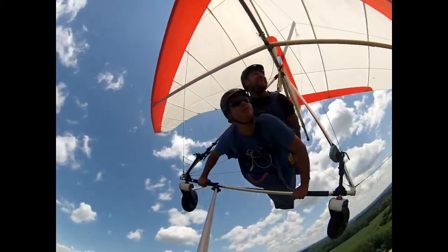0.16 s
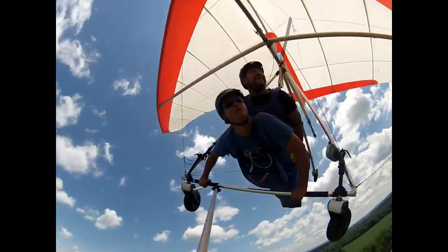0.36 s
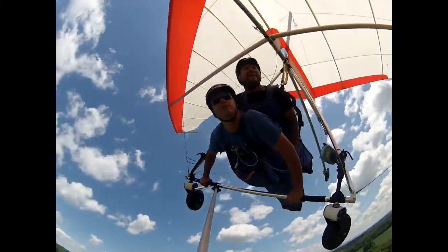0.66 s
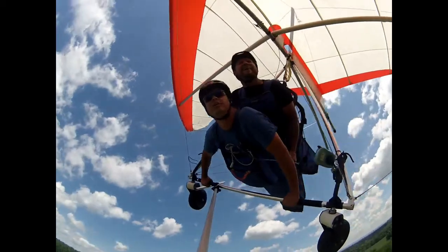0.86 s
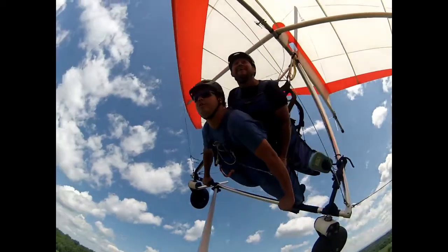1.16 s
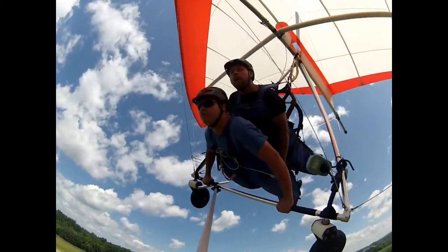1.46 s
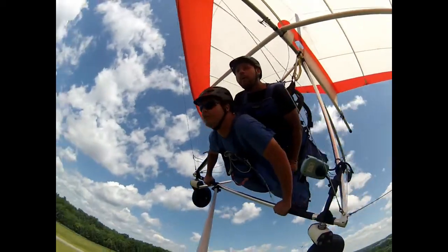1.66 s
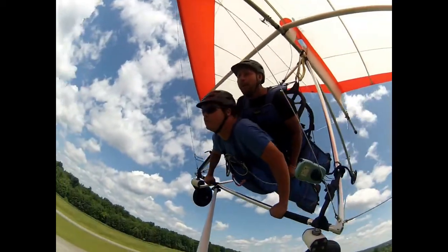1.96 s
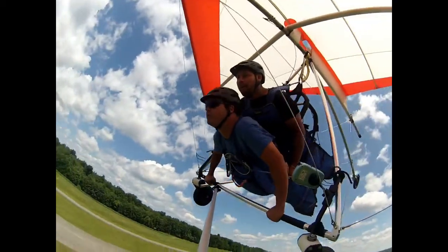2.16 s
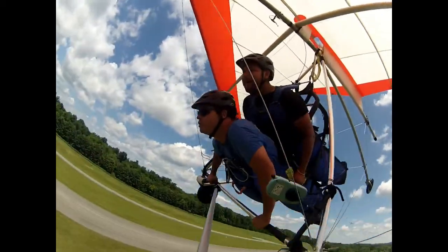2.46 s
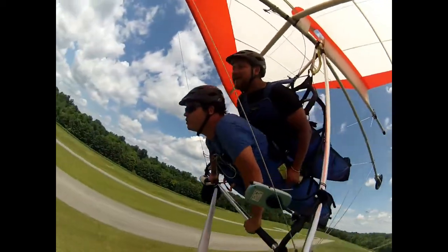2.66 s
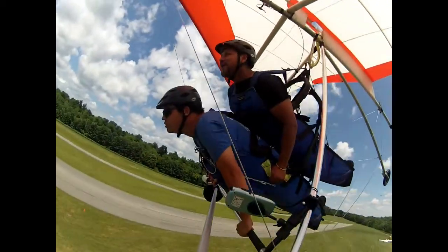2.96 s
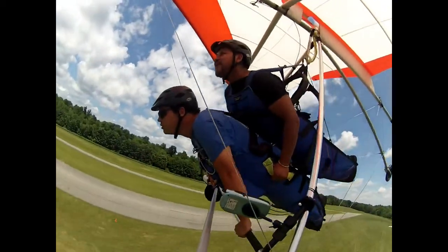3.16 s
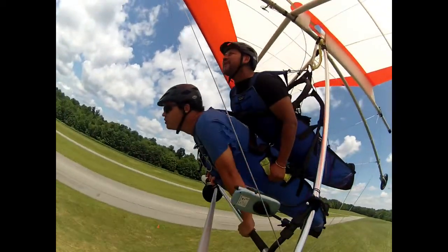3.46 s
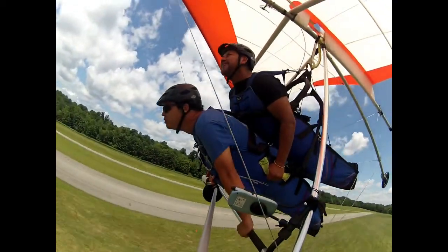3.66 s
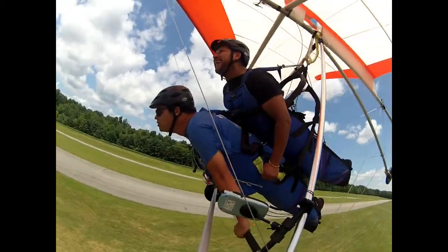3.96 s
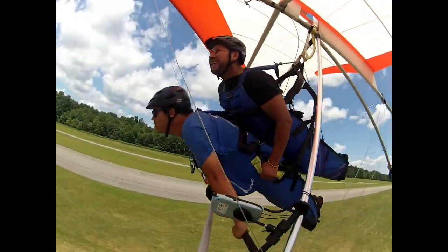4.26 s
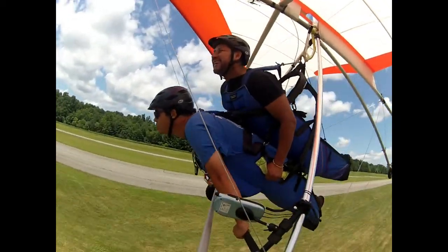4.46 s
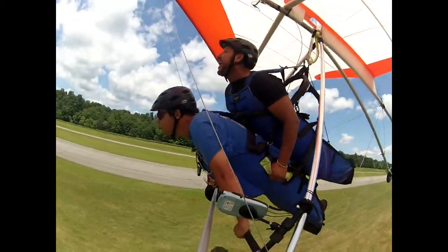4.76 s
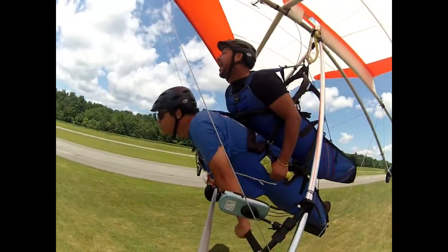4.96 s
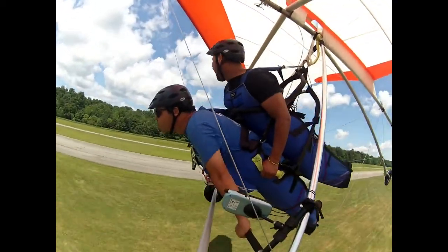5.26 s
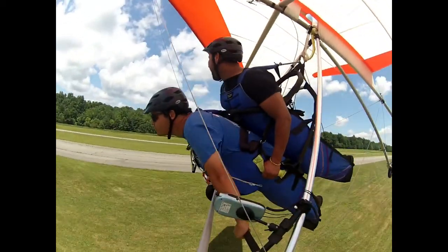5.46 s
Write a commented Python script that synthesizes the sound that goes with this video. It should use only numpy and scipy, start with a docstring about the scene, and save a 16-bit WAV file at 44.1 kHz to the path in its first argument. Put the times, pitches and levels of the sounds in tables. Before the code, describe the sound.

Air rushes over a small housed microphone in flight, deep and fluttering, building over several seconds to a strong gusty roar.

```python
"""Wind noise: air rushes over a small camera in a hard housing on a gliding wing.
Every size of eddy is noise, coloured by its own spectrum, with a level that varies in time:
large ones sway and buffet, middle ones rumble, growl and roar,
small ones rush and whoosh in ragged bursts, the smallest fizz and crackle at the port.
Beneath lie a faint electronic whine and hiss; the treble is dulled above 10.5 kHz and ends near 15.7 kHz."""
import sys
import numpy as np
from scipy import signal
from scipy.fft import rfft, irfft, next_fast_len
from scipy.io import wavfile
from scipy.ndimage import uniform_filter1d

SR = 44100
rng = np.random.default_rng(int(sys.argv[2]) if len(sys.argv) > 2 else 0)


def transcribe(signal):
    """Save signal, clipped to [-1, 1], as a 16-bit WAV file at the path in sys.argv[1]."""
    frames = np.atleast_2d(signal).T
    limited = np.clip(frames, -1, 1)
    pcm = np.round(limited * 32767).astype(np.int16)
    wavfile.write(sys.argv[1], SR, pcm)


N = 246959

# Spectral density of the smallest eddies, at the port, before scaling to rms 1: frequency_hz, density_db
FIZZ_SPECTRUM = [(1300, -19), (2600, 6.5), (3400, 4.5), (4100, 2.5), (5500, 2), (7100, -4.5), (8600, -10),
                 (10400, -13.5), (15000, -13.5)]


def gain_of(db):
    """Level: decibels express an amplitude ratio as 20 times its logarithm."""
    return 10 ** (np.asarray(db) / 20)


def evened(x):
    """Normalisation: division by the root mean square gives rms 1."""
    return x / np.sqrt(np.mean(x ** 2) + 1e-20)


def colour(x, points):
    """Linear filtering: a spectrum drawn on a log-frequency axis weights the signal, then rms is 1."""
    point_hz, point_db = np.transpose(points)
    size = next_fast_len(N)
    hz = np.fft.rfftfreq(size, 1 / SR)
    response_db = np.interp(np.log(hz + 1), np.log(point_hz + 1), point_db)
    filtered = irfft(rfft(x, size) * gain_of(response_db), size)
    return evened(filtered[:N])


def curve(points):
    """Slow variation: each column of a table becomes straight lines in time."""
    s, *columns = np.transpose(points)
    return [np.interp(np.arange(N) / SR, s, c) for c in columns]


def bells(table, half_s):
    """Transient envelope: Gaussian swells in dB, 1/e at half_s, added up for each column."""
    s, *columns_db = np.transpose(table)
    shapes = np.exp(-((np.arange(N) / SR - s[:, None]) / half_s) ** 2)
    return np.array(columns_db) @ shapes


def flutter(lo_hz, hi_hz):
    """Random modulation: band-limited 1/f noise of rms 1, whose slower swings are larger."""
    fall_db = -10 * np.log10(hi_hz / lo_hz)
    points = [(lo_hz / 2, -40), (lo_hz, 0), (hi_hz, fall_db), (hi_hz * 2, -60)]
    return colour(rng.standard_normal(N), points)


def steadied(x, span_s, share):
    """Envelope compression: a share of the slow lumps is divided out, so the level tables set most of them."""
    size = round(span_s * SR)
    power = uniform_filter1d(uniform_filter1d(x ** 2, size), size)
    return evened(x / (abs(power) + 1e-9) ** (np.clip(share, 0, 1) / 2))


def eddies(points, level_db, ragged_db, steady):
    """Turbulence: white noise flutters as eddies pass, then takes their spectrum and level."""
    lump_s = .06  # averaging span for the lumps in the noise
    fluttering = rng.standard_normal(N) * gain_of(ragged_db)
    noise = colour(fluttering, points)
    return gain_of(level_db) * steadied(noise, lump_s, steady)


def large_eddies(swell_db):
    """Low-frequency turbulence: the largest eddies sway and buffet the housing."""
    # Base levels, before the swells: start_s, sway_db, buffet_db
    buffet_level = [(0.0, -44, -41.5), (.35, -40.5, -42), (.55, -41.5, -40), (.75, -37.5, -40),
                    (.95, -52, -37.5), (1.1, -45, -39), (1.4, -43.5, -35), (1.65, -52, -42),
                    (1.83, -52, -32.5), (2.0, -43.5, -47.5), (2.15, -53.5, -37), (2.5, -46.5, -42.5),
                    (2.78, -37, -40.5), (2.95, -54, -36.5), (3.15, -41, -34), (3.35, -41, -42.5),
                    (3.6, -42, -36.5), (4.0, -44, -37), (4.2, -50, -34), (4.38, -37.5, -38.5),
                    (4.55, -51, -37.5), (4.8, -35, -44.5), (4.93, -46, -37.5), (5.05, -43, -36),
                    (5.38, -43, -43), (5.55, -46, -40), (5.6, -47, -26)]
    # Spectral density before scaling to rms 1: frequency_hz, density_db
    buffet_spectrum = [(25, -42), (50, -11), (70, -3), (95, 0.5), (120, -7.5), (250, -39.5), (500, -84.5)]
    sway_spectrum = [(8, -42.5), (20, -9), (35, -1), (50, 0), (65, -8), (120, -40.5), (300, -83)]
    sway_db, buffet_db = curve(buffet_level)
    buffet = eddies(buffet_spectrum, buffet_db + swell_db, 0, 0.6)
    sway = eddies(sway_spectrum, sway_db + swell_db, 0, 0.22)
    return buffet + sway


def middle_eddies(rumble_db, growl_db, swell_db, knocks, flicker):
    """Shared modulation: the same knocks shake rumble and growl, so both swell together."""
    # Spectral density before scaling to rms 1: frequency_hz, density_db
    rumble_spectrum = [(40, -30), (85, -9.5), (120, 1.5), (165, 3), (210, -2.5), (300, -31), (600, -81)]
    growl_spectrum = [(90, -35.5), (170, -6), (220, -0.5), (290, -1), (350, -7), (500, -33), (1000, -78)]
    rumble = eddies(rumble_spectrum, rumble_db + swell_db + 0.52 * knocks, 0.21 * flicker, 0.62)
    growl = eddies(growl_spectrum, growl_db + swell_db + 0.53 * knocks, 0.81 * flicker, .55)
    return rumble + growl


def roaring_eddies(roar_db, rush_db, swell_db, lumps, flurries, flicker):
    """Equal-power crossfade: a dull roar in slack air gives way to a brighter one as the rush grows."""
    # Spectral density before scaling to rms 1, in brisk and in slack air: frequency_hz, density_db
    brisk_spectrum = [(150, -39), (280, -8.5), (370, -1), (520, -4.5), (800, -12), (1100, -27.5),
                      (2200, -74.5)]
    slack_spectrum = [(150, -37), (280, -7), (350, -2), (450, -5), (650, -15), (1100, -36.5), (2200, -75.5)]
    slack_db, brisk_db = -60.5, -45.  # base rush levels between which the roar brightens
    brisk = np.clip((rush_db - slack_db) / (brisk_db - slack_db), 0, 1)
    level_db = roar_db + swell_db + 0.3 * lumps
    ragged_db = 0.25 * flurries + 1.2 * flicker
    bright = eddies(brisk_spectrum, level_db, ragged_db, 0.66)
    dull = eddies(slack_spectrum, level_db, ragged_db, 0.65)
    return np.sqrt(brisk) * bright + np.sqrt(1 - brisk) * dull


def small_eddies(rush_db, whoosh_db, swell_db, lumps, flurries, flicker):
    """Amplitude modulation: fast flicker makes rush and whoosh ragged, slow lumps make them surge."""
    # Spectral density before scaling to rms 1: frequency_hz, density_db
    rush_spectrum = [(300, -31.5), (700, -1), (950, -1), (1400, -7.5), (1900, -16), (2600, -35.5),
                     (4000, -68.5)]
    whoosh_spectrum = [(700, -36.5), (1400, -3.5), (1800, -1.5), (2400, -4.5), (2750, -11), (3200, -19),
                       (4000, -31.5), (6000, -62.5)]
    rush_level_db = rush_db + swell_db + 0.57 * lumps
    whoosh_level_db = whoosh_db + 0.66 * swell_db + 0.55 * lumps
    rush = eddies(rush_spectrum, rush_level_db, 0.22 * flurries + 1.2 * flicker, 0.44)
    whoosh = eddies(whoosh_spectrum, whoosh_level_db, 0.36 * flurries + 1.5 * flicker, 0.38)
    return rush + whoosh


def crackle(per_s, spread_db):
    """Impulse noise: sparse random pulses of uneven size and either sign take the fizz spectrum."""
    excess = np.minimum(rng.exponential(1, N), 4)
    size = gain_of(spread_db * excess) * rng.choice([-1., 1.], N)
    struck = rng.random(N) < per_s / SR
    return colour(size * struck, FIZZ_SPECTRUM)


def smallest_eddies(fizz_db, lull_db, lumps, flurries, flicker):
    """High-frequency turbulence: continuous fizz at the port, with a fainter crackle at 150 pulses/s."""
    level_db = fizz_db + 0.34 * lumps - lull_db
    ragged_db = 0.25 * flurries + 0.37 * flicker + 0.27 * flutter(6.2, 30.)
    fizz = eddies(FIZZ_SPECTRUM, level_db, ragged_db, .3)
    return fizz + gain_of(level_db - 6.5) * crackle(150., 2.5)


def wind():
    """Superposition: all sizes of eddy add up, tied together by shared swells, lulls and flutter."""
    # Base levels over time, rising overall with airspeed, with random lumps of turbulence included:
    # start_s, rumble_db, growl_db, roar_db, rush_db
    airflow = [(0.0, -40, -38.5, -48, -59), (.19, -39.5, -41, -45.5, -59.5),
               (.4, -39.5, -39.5, -48.5, -58.5), (.65, -38.5, -43, -49, -60.5),
               (.74, -41, -39.5, -43.5, -57.5), (.85, -44.5, -35, -40, -54),
               (1.0, -34.5, -41, -41.5, -52.5), (1.1, -39, -36.5, -37, -50.5),
               (1.25, -42.5, -36, -41, -50.5), (1.6, -34.5, -38.5, -35, -49), (1.8, -40, -36, -36, -48),
               (2.05, -40.5, -36.5, -36.5, -48), (2.17, -40, -36.5, -40.5, -48),
               (2.4, -35.5, -40, -42, -46.5), (2.6, -34.5, -38, -41, -48), (2.8, -36.5, -36, -41.5, -48.5),
               (3.05, -35.5, -38, -36, -44.5), (3.35, -33, -33, -33.5, -43.5),
               (3.6, -37.5, -33, -38.5, -44.5), (3.9, -35, -38, -38.5, -47), (4.1, -33.5, -35.5, -39, -46),
               (4.2, -38, -34.5, -34, -42.5), (4.45, -31.5, -34.5, -36, -46.5), (4.6, -40, -35, -37.5, -44),
               (4.7, -31.5, -35.5, -37, -44), (4.82, -37, -31, -36.5, -44.5), (4.9, -36, -35.5, -37.5, -45),
               (4.97, -42, -40, -35, -43.5), (5.07, -33, -35.5, -37, -44.5), (5.28, -38, -34.5, -37, -45.5),
               (5.38, -38, -40, -39, -45), (5.47, -35, -37, -36.5, -46.5), (5.6, -36, -36.5, -39.5, -46)]
    # Base levels of the smaller eddies: start_s, whoosh_db, fizz_db
    fizz_level = [(0.0, -68.5, -80), (.6, -71.5, -83), (.72, -69.5, -81.5), (.85, -65, -79.5),
                  (1.1, -62, -78.5), (1.54, -59.5, -77.5), (2.13, -60.5, -78), (2.75, -58, -74),
                  (2.95, -57, -72.5), (3.17, -56.5, -72.5), (4.0, -56.5, -72), (4.7, -56.5, -71),
                  (5.3, -57, -72.5), (5.6, -59.5, -75)]
    # Single eddies that strike the housing, or briefly leave it, as level changes:
    # centre_s, sway_and_buffet_db, rumble_and_growl_db, roar_and_rush_db (whoosh takes 0.66 of the last)
    thumps = [(.06, 9, 2, 1), (.125, -3, 6.5, 2.5), (.535, 3, 1.5, 7), (.6, -9, -7, 0.5), (.7, 9, 1, 4),
              (.86, 6, -8, 3.5), (1.889, -5, 5.5, 0.5), (2.0, 1, -1, -4), (2.62, 8.5, -1, -1),
              (2.72, 7, -2, 0), (2.97, 8, 3.5, 0), (3.13, 5, -3, 1.5), (3.57, -7, -12, -0.5),
              (3.8, 5, 7, 4), (3.93, 2, -5, 1.5), (4.23, 6, 5, -1.5), (4.295, 1, 5, 3.5), (4.4, 1, 4, 2),
              (4.445, 3, 0, 0), (4.665, 2, 3.5, 1.5), (4.78, 1, 6, 2), (4.833, -3, 6, 2.5),
              (5.04, 7, 4, -1), (5.085, -10, 6, 1.5), (5.18, 0, 1.5, 0)]
    # Brief thinning of the small eddies, a negative depth being a swell:
    # centre_s, roar_and_rush_depth_db (whoosh takes 0.66 of it), fizz_depth_db
    lulls = [(.23, 6, 1), (.63, 2, 0), (1.25, 2.5, 0), (2.14, -1, 1), (2.58, 0.5, 4), (2.7, 2.5, 4),
             (3.58, 1.5, 3), (4.07, 4, 3), (4.3, 4, 4), (5.0, 2.5, 2), (5.12, 1.5, 4), (5.38, 3.5, 0)]
    # Brief sharp changes of the small eddies: centre_s, roar_db, rush_db (whoosh takes 0.66 of it)
    bursts = [(.283, -1, 7), (.875, 1, 2), (1.06, 4, 3), (1.169, -1, 3), (1.468, 6.5, 0), (1.546, 5.5, -2),
              (1.656, 1, 6), (1.684, 3.5, 5.5), (1.98, 3, 5), (2.028, -2, 2), (2.21, 4, 6), (3.07, -4, 4.5),
              (3.236, 2, 5), (3.352, -1, -2.5), (3.445, -4, 4.5), (4.277, -5, 2), (4.514, 1, 8),
              (4.6, 8.5, 4), (4.685, 2, 6), (4.939, 4, 7), (5.321, 3, 4), (5.489, 1, 3)]
    thump_s, lull_s, burst_s = 0.0084, 0.016, 0.0037  # half-lengths

    rumble_db, growl_db, roar_db, rush_db = curve(airflow)
    whoosh_db, fizz_db = curve(fizz_level)
    buffet_swell_db, rumble_swell_db, thump_db = bells(thumps, thump_s)
    rush_lull_db, fizz_lull_db = bells(lulls, lull_s)
    roar_burst_db, rush_burst_db = bells(bursts, burst_s)
    swell_db = thump_db - rush_lull_db

    lumps, knocks = flutter(3.8, 13.0), flutter(10.0, 49.0)
    flurries, flicker = flutter(13.0, 60.0), flutter(26.0, 250.0)
    large = large_eddies(buffet_swell_db)
    middle = middle_eddies(rumble_db, growl_db, rumble_swell_db, knocks, flicker)
    roar = roaring_eddies(roar_db, rush_db, swell_db + roar_burst_db, lumps, flurries, flicker)
    small = small_eddies(rush_db, whoosh_db, swell_db + rush_burst_db, lumps, flurries, flicker)
    smallest = smallest_eddies(fizz_db, fizz_lull_db, lumps, flurries, flicker)
    return large + middle + roar + small + smallest


def whine():
    """Amplitude modulation: a thin high sine tone wavers randomly in level."""
    # Electronic tone, rms level before wavering: pitch_hz, level_db
    tones = [(10519, -99)]
    t = np.arange(N) / SR
    total = np.zeros(N)
    for pitch_hz, level_db in tones:
        waver_db = 1.5 * flutter(3., 30.)
        sine = np.sqrt(2) * np.sin(2 * np.pi * pitch_hz * t)  # rms 1
        total = total + gain_of(level_db + waver_db) * sine
    return total


def hiss():
    """Stationary random noise: the preamplifier hisses steadily."""
    # Spectral density before scaling to rms 1: frequency_hz, density_db
    hiss_spectrum = [(2100, 0), (8000, -4.5), (15500, -1)]
    return gain_of(-95) * colour(rng.standard_normal(N), hiss_spectrum)


def scene():
    """Superposition: wind at the one microphone port adds to the electronic whine and hiss."""
    return (wind() + whine() + hiss())[None]


def record(dry):
    """Band limitation: after a soft start and stop, two linear-phase filters dull and cut the treble."""
    # Treble roll-off of the whole sound: frequency_hz, gain_db
    treble_rolloff = [(0, 0), (10500, 0), (11800, -5), (12700, -6), (12800, -17), (22050, -17)]
    fade_s, edge_hz = .006, 15700
    hz, db = np.transpose(treble_rolloff)
    edge = np.minimum(np.arange(N), np.arange(N)[::-1]) / (fade_s * SR)
    soft = dry * np.sin(np.pi / 2 * np.minimum(edge, 1)) ** 2
    treble_filter = signal.firwin2(1023, hz, gain_of(db), fs=SR)
    dull = signal.oaconvolve(soft, treble_filter[None], "same")
    band_filter = signal.firwin(511, edge_hz, window=("kaiser", 9), fs=SR)
    return signal.oaconvolve(dull, band_filter[None], "same")


dry = scene()
out = record(dry)
transcribe(out)
```